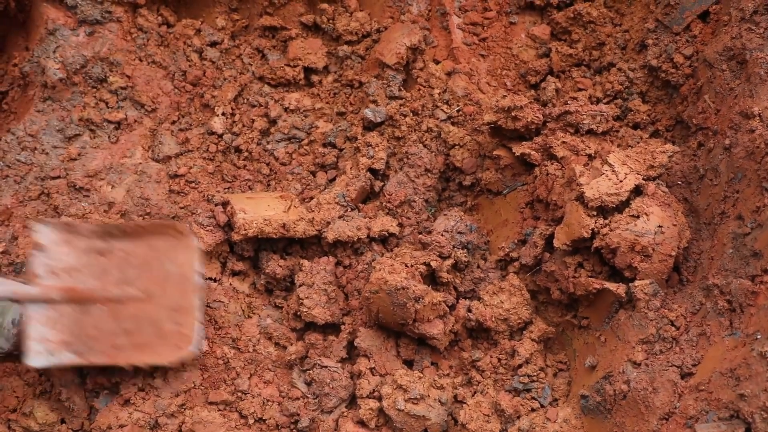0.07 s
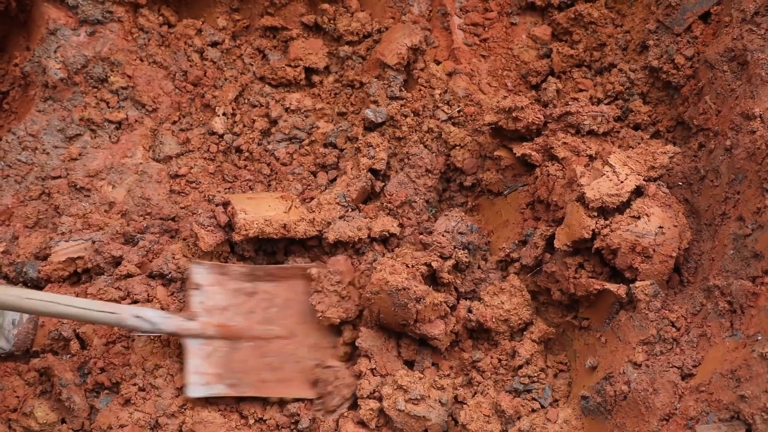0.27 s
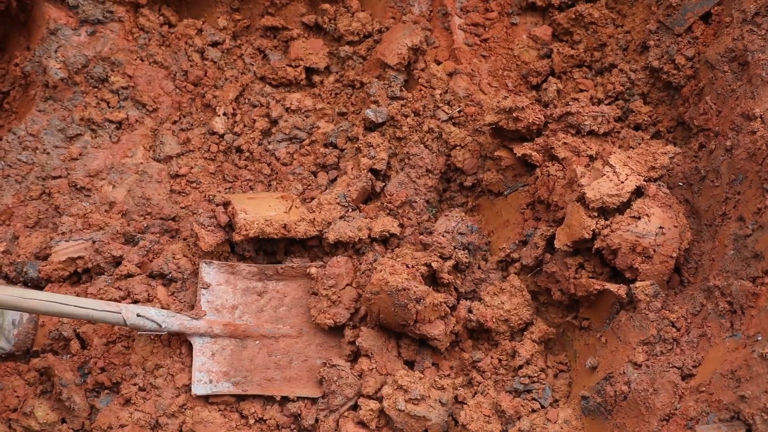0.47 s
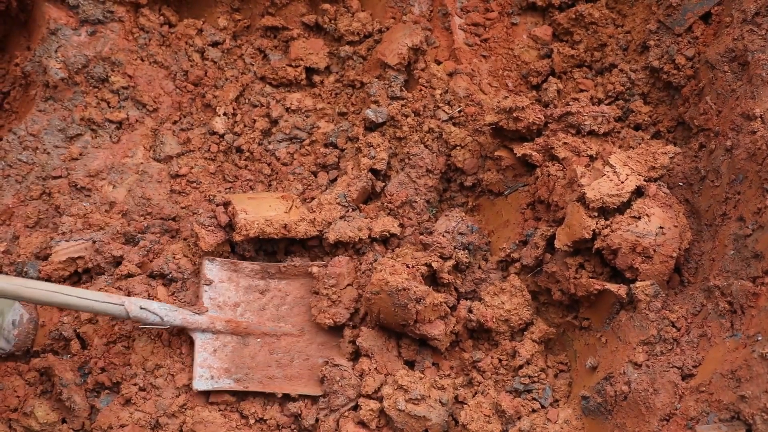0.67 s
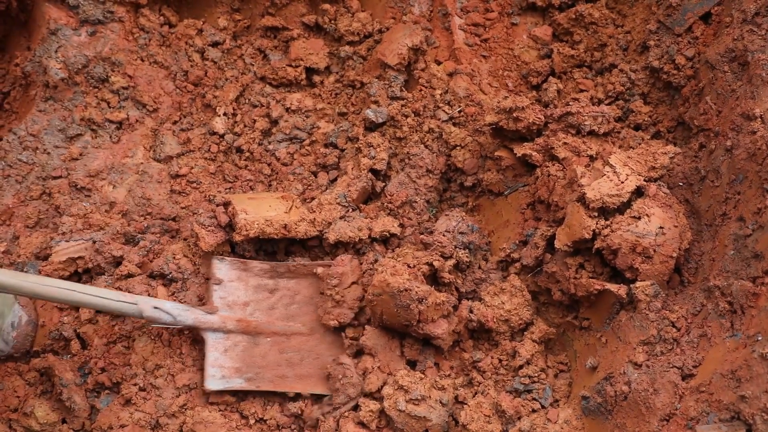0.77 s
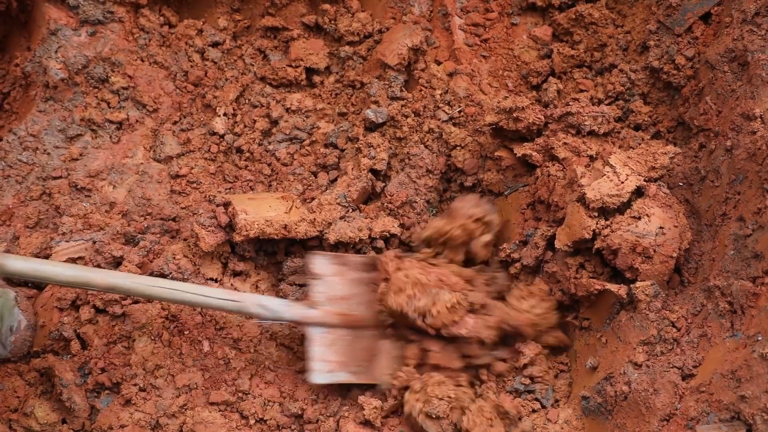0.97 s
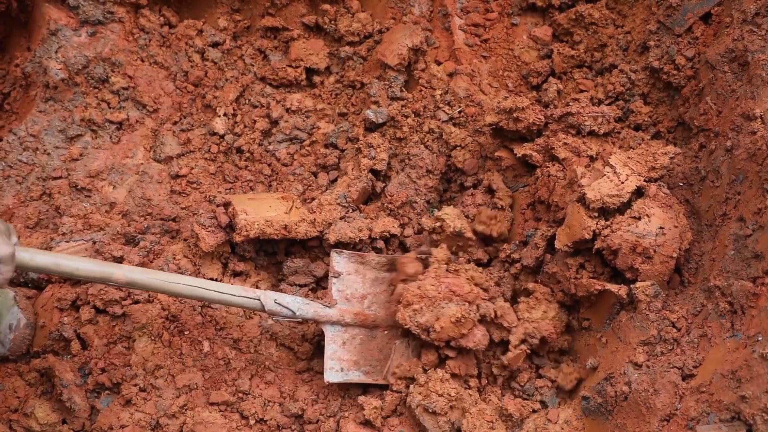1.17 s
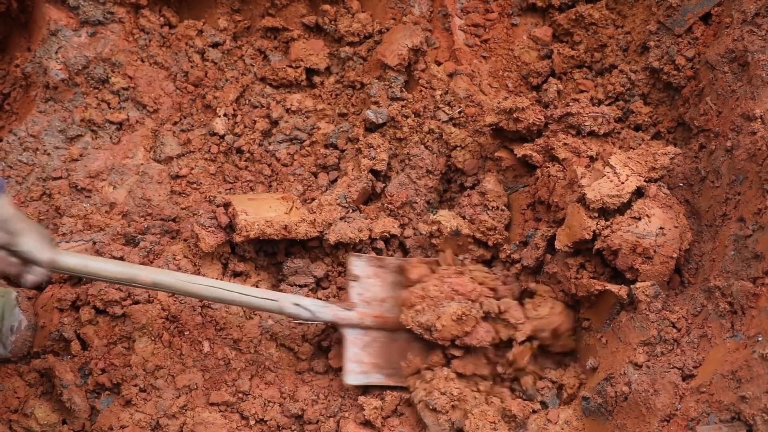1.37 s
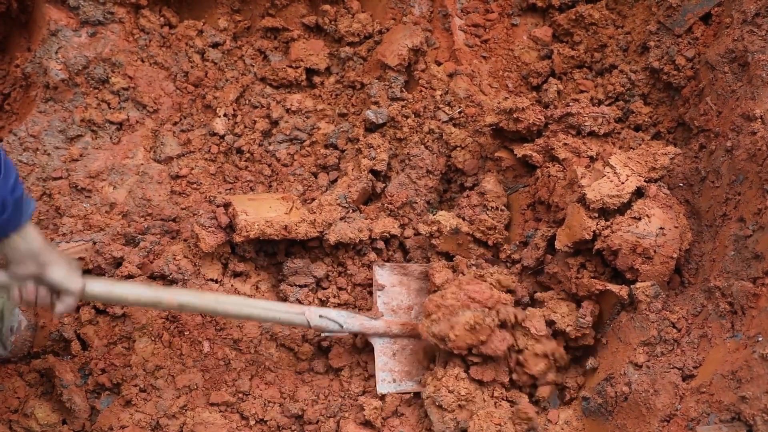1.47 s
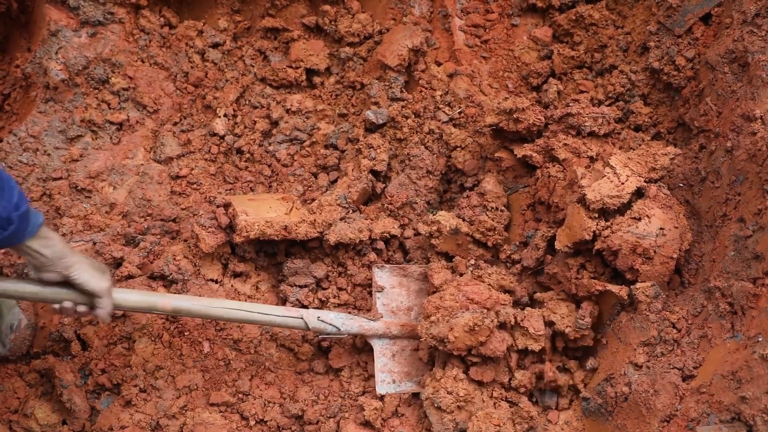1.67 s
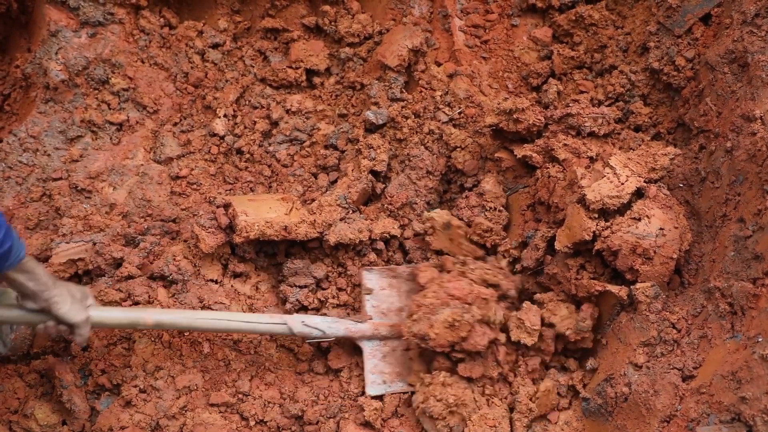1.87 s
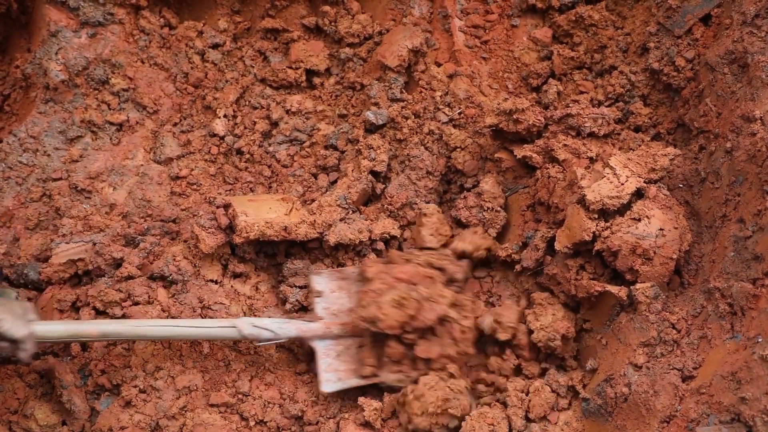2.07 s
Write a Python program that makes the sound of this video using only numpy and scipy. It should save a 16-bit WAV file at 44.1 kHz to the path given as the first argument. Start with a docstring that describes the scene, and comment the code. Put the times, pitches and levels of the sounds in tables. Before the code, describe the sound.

Spade blade strikes clay soil with a short gritty clank, followed by crunching scrapes and tumbling lumps

```python
"""A steel spade digs wet clay in a shallow pit outdoors, heard from close by.
The blade strikes with a short clank made of fading tones, then scrapes: streams of clicks ring the steel.
It shoves loose soil forward twice: clods tumble, knock and thud, made from filtered clicks and fading tones.
Grit snaps as filtered single clicks, a small stone clinks, and a few crumbs settle.
Close echoes suggest the pit walls, and filtered noise makes a faint outdoor hiss."""
import sys
import numpy as np
from scipy import signal
from scipy.fft import rfft, irfft, next_fast_len
from scipy.io import wavfile

SR = 44100
rng = np.random.default_rng(int(sys.argv[2]) if len(sys.argv) > 2 else 0)


def generate_wav(sig):
    """Save sig (samples, or channels by samples) to the path in sys.argv[1] as 16-bit PCM at SR."""
    pcm = np.round(np.clip(np.atleast_2d(sig).T, -1, 1) * 32767).astype(np.int16)
    wavfile.write(sys.argv[1], SR, pcm)


N = 92610
T = np.arange(N) / SR  # time of every sample in seconds

# Tones of the blade, damped by the clay. Each row: pitch in Hz, relative level in dB when struck,
# relative level in dB when rubbed, time to fade by 60 dB in seconds.
BLADE_TONES = [(608.4, -15, 6, 0.056), (819, -33, 3.5, 0.04), (1124, -16.5, -7.5, 0.13),
               (1208, -40, -7, 0.088), (1428, -17, -24, 0.18), (1462, 0, -23, 0.027),
               (1582, -11, 5.5, 0.057), (1914, -27, -12.5, 0.17), (2054, -36, 4.5, 0.027),
               (2596, -14, 2.5, 0.048), (2756, -17.5, -1.5, 0.053), (2920, -19.5, 1, 0.056),
               (3010, -19.5, -3.5, 0.095), (3816, -34, -5.5, 0.11), (4150, -36, -9.5, 0.11)]
# The blade slides through soil. Each row: start in seconds, rise in seconds, hold in seconds,
# time to fade by 60 dB in seconds, level in dB, then hiss and blade ring in dB relative to that level,
# rasp centre in Hz, rasp in dB relative to that level.
SCRAPES = [(0.2187, 0.00053, 0.014, 0.08, -19.5, -9, -2.5, 1510, -6.5),
           (0.259, 0.045, 0.015, 0.068, -26.5, -3.5, 1, 2650, 0.5),
           (0.311, 0.016, 0.023, 0.024, -28, -6, -5, 2690, -0.5),
           (.33, 0.019, 0.013, 0.51, -47.5, 0, -3, 2690, -1.5),
           (0.523, 0.028, 0.0089, 0.27, -41.5, -10, -12, 1250, 3),
           (0.682, 0.021, 0.01, .1, -43.5, -2, -4, 2720, -5),
           (0.705, .004, 0.0066, 0.19, -34.5, -5.5, -2, 2700, -3.5),
           (0.74, 0.1, .07, 0.15, -32.5, -8, -6, 1810, -19),
           (0.917, 0.0069, 0.013, 0.11, -26.5, -9, -3, 2480, -10),
           (0.953, 0.0081, 0.031, 0.14, -27, -13, -9.5, 1906, -12),
           (1.015, 0.023, 0.0075, 0.14, -32.5, -11, -22, 1910, -7.5),
           (1.341, 0.017, 0.056, 0.033, -34, -10, -29, 2180, 3),
           (1.386, 0.022, 0.026, 0.39, -32, -8, -4, 2080, 0),
           (1.454, 0.014, 0.02, 0.18, -48, 0, -10, 2200, -18),
           (1.577, 0.014, 0.0035, 0.04, -46.5, -24, -7, 2200, 3),
           (1.717, .002, 0.018, .03, -42, -10, -3, 3200, -10),
           (1.886, 0.019, 0.061, 0.069, -49.5, -17, -14, 1980, -5),
           (2.062, 0.038, .02, .1, -43, -7.5, -6, 1500, 1)]
# Tone colour of the scrape's crunch. Each row: frequency in Hz, relative level in dB.
CRUNCH_COLOUR = [(60, -49), (200, -15.5), (400, -2), (620, 3), (1000, 3.5), (1600, 5), (2200, 1.5),
                 (2750, 0), (3400, -0.5), (4300, -12.5), (5200, -16), (9000, -49)]
# Tone colour of the gritty hiss. Each row: frequency in Hz, relative level in dB.
HISS_COLOUR = [(2500, -16), (4200, 4), (5200, -4), (6300, 1), (7300, -0.5), (8200, -5.5), (9200, 2.5),
               (10900, 0), (12500, -5.5), (15000, -17.5)]
# Loose soil tumbles. Each row: start in seconds, rise in seconds, hold in seconds,
# time to fade by 60 dB in seconds, level in dB.
TUMBLES = [(0.229, 0.026, 0.011, 0.046, -34), (0.317, 0.0095, 0.016, 0.063, -35),
           (0.528, .02, 0.057, 0.27, -47), (0.694, .015, 0.025, 0.13, -39),
           (0.791, 0.076, 0.042, 0.29, -28.5), (1.086, 0.02, 0.0087, 0.1, -41.5),
           (1.338, 0.011, 0.011, 0.092, -33.5), (1.419, 0.035, .004, .13, -33),
           (1.519, 0.0096, 0.0083, 0.11, -44), (1.689, 0.016, 0.0082, 0.034, -43.5),
           (1.882, 0.028, 0.048, .08, -47.5)]
# Tone colour of tumbling crumbs. Each row: frequency in Hz, relative level in dB.
SOIL_COLOUR = [(40, -60.5), (110, -34), (200, -6.5), (330, -9), (600, 3), (950, -2), (1400, -13),
               (2500, -3.5), (4500, -28.5), (12000, -107)]
# Low tones of the blade under a load of soil. Each row: pitch in Hz, relative level in dB,
# time to fade by 60 dB in seconds.
LOADED_BLADE_TONES = [(450, -4.5, 0.028), (564, 1, 0.099), (620.4, -4, 0.11), (779, -6, 0.098),
                      (977, -2.5, 0.06)]
# Single clods knock on the blade and ground. Each row: time in seconds, relative level in dB,
# middle pitch in Hz, time to fade by 60 dB in seconds.
KNOCKS = [(.2445, -16, 2420, 0.022), (.7865, -29, 2230, .012), (.8385, -24.5, 3300, 0.016),
          (0.8553, -13.5, 1380, 0.013), (.873, -16, 766, 0.056), (.887, -17, 945, 0.034),
          (.9145, -12, 670, 0.012), (.9225, -15, 691, 0.029), (.962, -21, 2450, 0.014),
          (.9858, -5.5, 1333, 0.016), (1.4095, -14.5, 1710, 0.0066), (1.4475, -25, 657, 0.034),
          (1.7175, -37.5, 854, 0.09), (1.943, -29, 550, 0.0086), (1.978, -37, 900, 0.01),
          (2.0915, -30, 1670, 0.021)]
# Tones inside every knock. Each row: multiple of the knock's pitch, relative level in dB.
KNOCK_TONES = [(.45, -10), (.74, -1), (1.0, -1), (1.3, -3.5), (1.7, -6.5), (2.4, -16.5)]
# Heavy lumps land. Each row: time in seconds, level in dB.
THUDS = [(.005, -70), (.045, -55), (0.239, -40), (.85, -35), (.92, -37), (0.955, -28.5), (0.989, -39),
         (1.004, -43), (1.064, -42), (1.112, -53), (1.351, -40.5), (1.389, -40), (1.499, -44), (1.93, -46),
         (2.075, -42.5)]
# Tone colour of a thud. Each row: frequency in Hz, relative level in dB.
THUD_COLOUR = [(25, -46), (60, -9), (120, -3), (220, 5), (400, 6.5), (1200, -32)]
# Grit snaps sharply. Each row: time in seconds, relative level in dB.
SNAPS = [(0.8983, 2.5), (0.9404, -13), (1.3924, 3.5), (1.4083, 2.5)]
# Tone colour of a snap. Each row: frequency in Hz, relative level in dB.
SNAP_COLOUR = [(200, -19), (1000, 0), (2300, -4.5), (4300, -0.5), (5300, -13), (6700, -9), (7300, 0.5),
               (8000, -13), (9000, 7.5), (10600, 3), (11700, -6.5), (12500, -20), (15000, -22)]
# Tones of a small stone. Each row: pitch in Hz, relative level in dB, time to fade by 60 dB in seconds.
STONE_TONES = [(3800, -42, .015), (4330, -30.5, 0.013), (4800, -44, .012), (10400, -39, .014),
               (11670, -37, .014), (12000, -35.5, 0.02)]
# Echoes from the sides of the pit. Each row: delay in seconds, level in dB relative to the direct sound.
PIT_ECHOES = [(.0011, -24), (.0046, -26)]
# Tone colour of the outdoor background. Each row: frequency in Hz, relative level in dB.
AIR_COLOUR = [(20, -32), (40, -15.5), (100, -5.5), (200, -5.5), (360, 2.5), (600, -1.5), (1300, -1),
              (1900, -0.5), (2700, -0.5), (4000, -8.5), (5500, -15), (8200, -18), (10000, -15),
              (12500, -21), (15000, -29)]
# Loudness of the background over time. Each row: time in seconds, level in dB.
AIR_LEVEL = [(0, -44.5), (.08, -48.5), (.18, -46), (.45, -45.5), (.66, -46), (1.2, -45.5), (1.32, -48.5),
             (1.65, -47.5), (1.85, -48.5), (1.97, -48.5), (2.04, -51)]
# Faint swells of high hiss. Each row: start in seconds, rise in seconds, hold in seconds,
# time to fade by 60 dB in seconds, level in dB.
SWELLS = [(.09, 0.1, 0.023, 0.15, -46), (0.398, 0.088, .08, 0.97, -58.5), (1.57, 0.068, 0.048, 0.31, -51)]

# Average clicks per second, and how unevenly strong the clicks are in dB
COARSE_GRAINS = dict(per_s=3200, spread_db=1.5)
FINE_GRAINS = dict(per_s=7000, spread_db=1)
RUBBING_GRAINS = dict(per_s=4100, spread_db=1.5)
CRUMB_GRAINS = dict(per_s=1800, spread_db=2.5)
BLADE_LOW_HZ, KNOCK_LOW_HZ = 507, 220  # small bodies give off little sound below these


def strike():
    """The edge meets the ground: a burst of clicks makes a crack and the steel's own tones make a clank."""
    strike_s, clank_db, crack_db, crack_t60_s = 0.2074, 1.5, -13, 0.044
    crack = from_db(crack_db) * dying(strike_s, crack_t60_s) * grains(**FINE_GRAINS)
    struck_tones = [(hz, db + clank_db, t60) for hz, db, _, t60 in BLADE_TONES]
    clank = ring_together(strike_s, struck_tones)
    body = low_cut(clank + colour(crack, CRUNCH_COLOUR), BLADE_LOW_HZ)
    return body + from_db(-7) * colour(crack, HISS_COLOUR)


def scrapes():
    """Grains catch and slip on the steel in a juddering stream; they rasp in one broad resonance and ring it."""
    judder = rms_one(from_db(2.5 * drift(55.6)))  # random shaking, slower than about 56 Hz
    coarse = judder * grains(**COARSE_GRAINS)
    fine = judder * grains(**FINE_GRAINS)
    catches = judder * grains(**RUBBING_GRAINS)
    slips = judder * grains(**COARSE_GRAINS)

    force = hiss = rub = rasp = 0
    for start, rise, hold, t60, db, hiss_db, ring_db, rasp_hz, rasp_db in SCRAPES:
        push = from_db(db) * stroke(start, rise, hold, t60)
        force = force + push
        hiss = hiss + push * from_db(hiss_db)
        rub = rub + push * from_db(ring_db)
        rasp = rasp + push * from_db(rasp_db) * resonance(slips, rasp_hz, 427.5)

    rubbed_tones = [(hz, db, t60) for hz, _, db, t60 in BLADE_TONES]
    blade = low_cut(ring_together(0, rubbed_tones), BLADE_LOW_HZ)
    ringing = excite(catches * rub, blade / np.linalg.norm(blade))
    return colour(coarse * force, CRUNCH_COLOUR) + colour(fine * hiss, HISS_COLOUR) + rasp + ringing


def clods():
    """Soft crumbs tumble and drum on the loaded blade, single clods knock and heavy lumps thud."""
    flow = sum(from_db(db) * stroke(*shape) for *shape, db in TUMBLES)
    crumbs = colour(flow * grains(**CRUMB_GRAINS), SOIL_COLOUR)

    blade = low_cut(ring_together(0, LOADED_BLADE_TONES), KNOCK_LOW_HZ)
    drumming = excite(flow * grains(**CRUMB_GRAINS), blade / np.linalg.norm(blade))

    knocks = 0
    for s, db, hz, t60 in KNOCKS:
        # each tone strays a little in pitch, by about 3.2 percent
        tones = [(hz * ratio * (1 + 0.032 * rng.standard_normal()), db + tone_db, t60)
                 for ratio, tone_db in KNOCK_TONES]
        knocks = knocks + ring_together(s, tones)

    weight = sum(from_db(db) * dying(s, t60=0.095) for s, db in THUDS)
    thuds = colour(weight * grains(**CRUMB_GRAINS), THUD_COLOUR)
    return crumbs + from_db(-3) * drumming + low_cut(knocks, KNOCK_LOW_HZ) + thuds


def grit():
    """Grit snaps against the steel: bright single clicks, each with a brief spray of splinters."""
    snap_db, spray_db, spray_t60_s = 3, -27.5, 0.028
    clicks = np.zeros(N)
    splinters = grains(**COARSE_GRAINS)
    for s, db in SNAPS:
        clicks[int(s * SR)] += from_db(db)
        clicks += from_db(db + spray_db) * dying(s, spray_t60_s) * splinters
    # an all-pass filter smears each click slightly in time
    smeared = signal.lfilter([.7, 0, 0, 1], [1, 0, 0, .7], clicks)
    return from_db(snap_db) * low_cut(colour(smeared, SNAP_COLOUR), 160)


def stone():
    """A small stone clinks: a quick rattle of contacts sets off its high, short tones."""
    clink_s, rattle_db, rattle_t60_s = 1.718, -18, 0.048
    contacts = from_db(rattle_db) * dying(clink_s, rattle_t60_s) * grains(**COARSE_GRAINS)
    return excite(contacts, ring_together(0, STONE_TONES))


def pit(x):
    """The earth walls send back close echoes and a short scattered tail with softened treble."""
    echoes = sum(from_db(db) * np.interp(T - delay, T, x, left=0) for delay, db in PIT_ECHOES)
    tail = rng.standard_normal(N) * dying(0.0025, t60=0.073)
    soften = signal.butter(1, 5000, fs=SR, output="sos")
    tail = signal.sosfilt(soften, tail / np.linalg.norm(tail))
    return x + echoes + from_db(-20.5) * excite(x, tail)


def outdoors():
    """Filtered noise makes a distant rush of slightly changing level, with faint swells of hiss."""
    level = from_db(np.interp(T, *np.transpose(AIR_LEVEL)))
    air = level * colour(rng.standard_normal(N), AIR_COLOUR)
    swell = sum(from_db(db) * stroke(*shape) for *shape, db in SWELLS)
    return air + swell * colour(rng.standard_normal(N), HISS_COLOUR)


def grains(per_s, spread_db):
    """Many tiny contacts: random clicks of uneven size and either sign, with average strength (rms) 1."""
    sizes = from_db(spread_db * np.minimum(rng.exponential(1, N), 4)) * rng.choice([-1, 1], N)
    return rms_one(sizes * (rng.random(N) < per_s / SR))


def ring_together(s, tones):
    """A struck body: all its tones start at s, with alternating signs."""
    return sum((-1) ** k * ring(s, *tone) for k, tone in enumerate(tones))


def ring(s, hz, db, t60):
    """One struck tone: a sine wave that starts at once and fades."""
    return from_db(db) * dying(s, t60) * np.sin(2 * np.pi * hz * (T - s))


def excite(x, response):
    """Every sample of x sets off its own scaled copy of the response (convolution)."""
    return signal.fftconvolve(x, response)[:N]


def dying(s, t60):
    """A loudness curve that jumps to 1 at s and falls by 60 dB every t60 seconds."""
    return (T >= s) * from_db(-60 * np.clip((T - s) / t60, 0, 4))


def stroke(start, rise, hold, t60):
    """A loudness curve that rises to 1, holds, then falls by 60 dB every t60 seconds."""
    fall = from_db(-60 * np.clip((T - start - rise - hold) / t60, 0, 4))
    return np.clip((T - start) / rise, 0, 1) * fall


def drift(hz):
    """Random wandering slower than about hz, with average strength (rms) 1."""
    slow = signal.butter(2, hz, fs=SR, output="sos")
    return rms_one(signal.sosfilt(slow, rng.standard_normal(N)))


def resonance(x, hz, width_hz):
    """A body that favours one pitch: a two-pole band filter used twice, scaled to rms 1."""
    r = np.exp(-np.pi * width_hz / SR)
    section = [1, 0, -1, 1, -2 * r * np.cos(2 * np.pi * hz / SR), r * r]
    return rms_one(signal.sosfilt([section, section], x))


def colour(x, spectrum):
    """Filter x to a tone colour without sounding ahead of time; white noise keeps its power."""
    size = next_fast_len(2 * N)
    hz, db = np.transpose(spectrum)
    log_hz = np.log(np.fft.rfftfreq(size, 1 / SR) + 1)
    gain = rms_one(from_db(np.interp(log_hz, np.log(hz), db)))
    # folding the cepstrum gives the filter its earliest possible response (minimum phase)
    cepstrum = irfft(np.log(gain), size)
    cepstrum[1:size // 2] *= 2
    cepstrum[size // 2 + 1:] = 0
    return irfft(rfft(x, size) * np.exp(rfft(cepstrum)), size)[:N]


def low_cut(x, hz):
    """Weaken what lies below hz with a second-order high-pass filter."""
    return signal.sosfilt(signal.butter(2, hz, "high", fs=SR, output="sos"), x)


def rms_one(x):
    """Scale to average strength (rms) 1."""
    return x / np.sqrt(np.mean(x ** 2) + 1e-20)


def from_db(db):
    """Turn decibels into a plain multiplier."""
    return 10 ** (np.asarray(db) / 20)


def scene():
    """Spade, soil and stone sound in the pit, over the outdoor background."""
    digging = strike() + scrapes() + clods() + grit() + stone()
    return (pit(digging) + outdoors())[None]


def record(dry):
    """Round off the loudest peaks and cut the top above 15600 Hz."""
    top_cut = signal.ellip(10, .2, 80, 15600, fs=SR, output="sos")
    return signal.sosfilt(top_cut, np.tanh(dry))


dry = scene()
out = record(dry)
generate_wav(out)
```